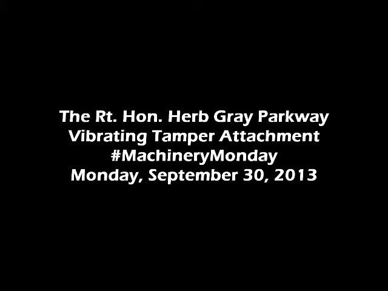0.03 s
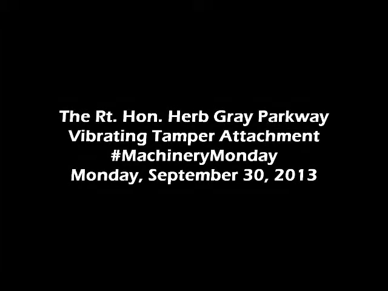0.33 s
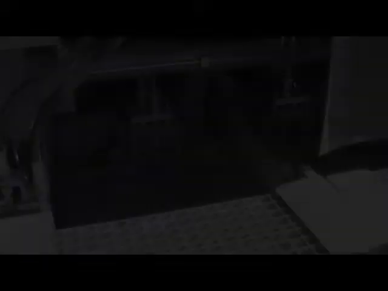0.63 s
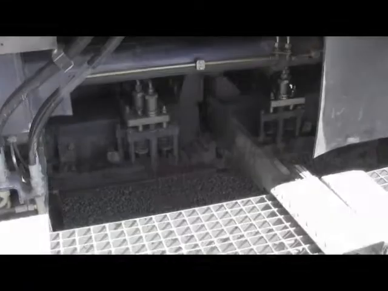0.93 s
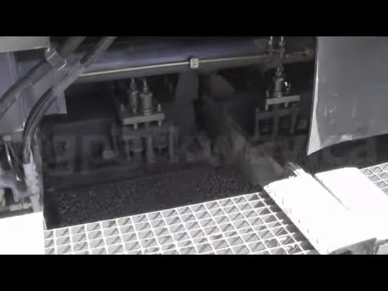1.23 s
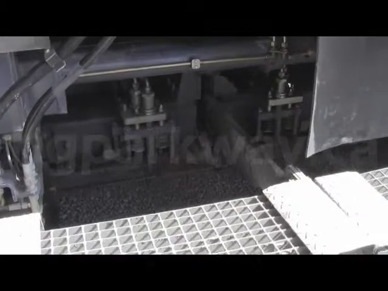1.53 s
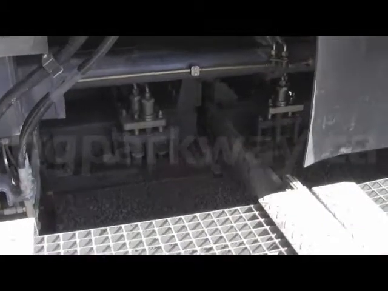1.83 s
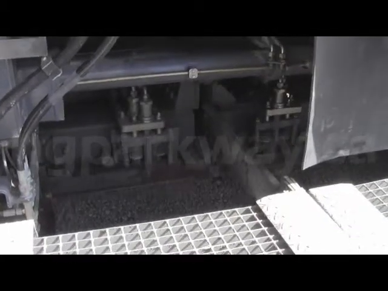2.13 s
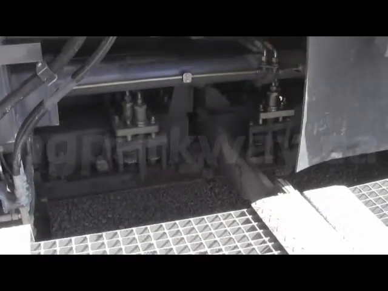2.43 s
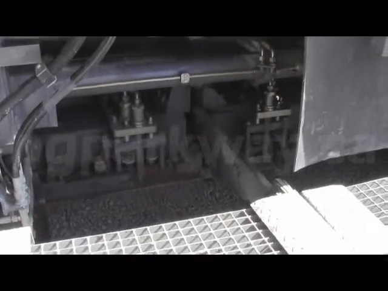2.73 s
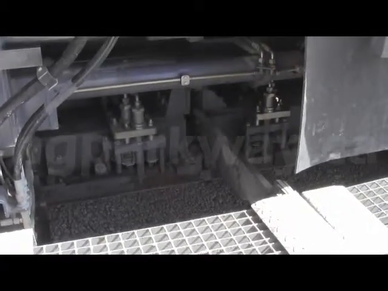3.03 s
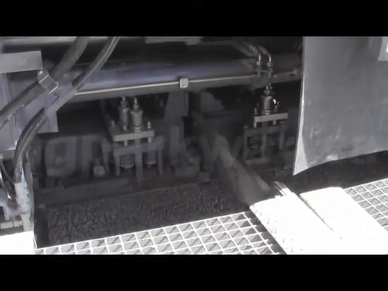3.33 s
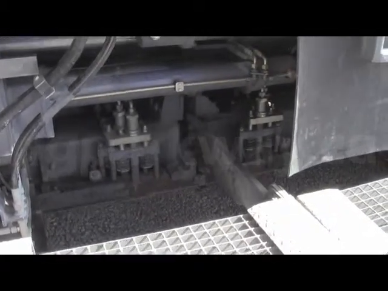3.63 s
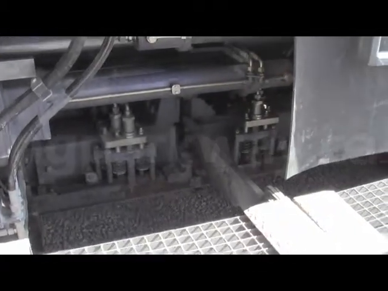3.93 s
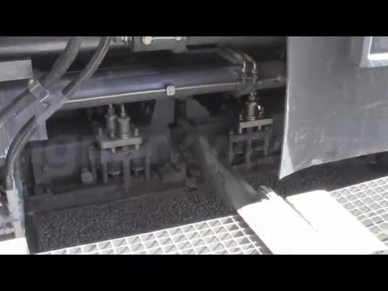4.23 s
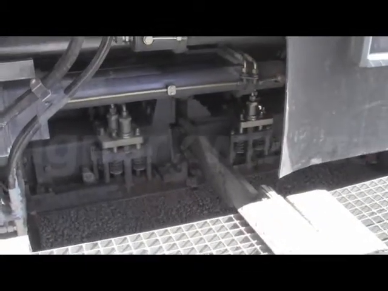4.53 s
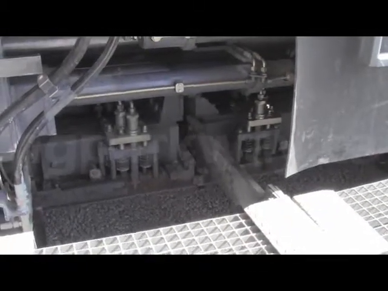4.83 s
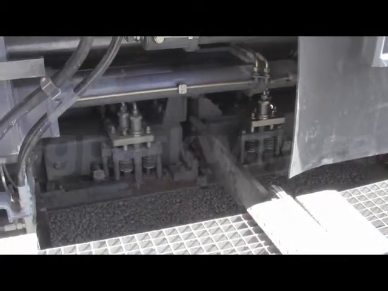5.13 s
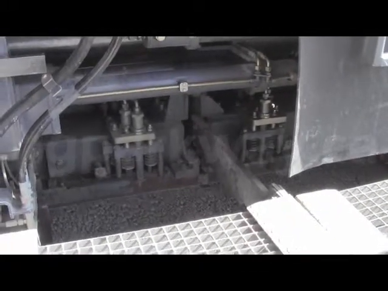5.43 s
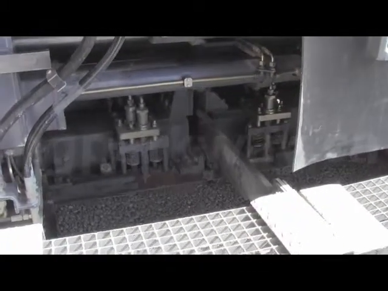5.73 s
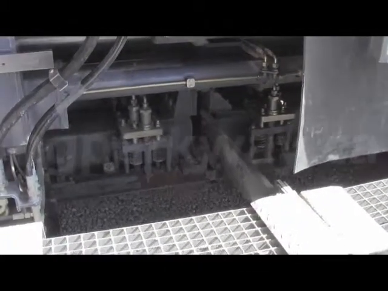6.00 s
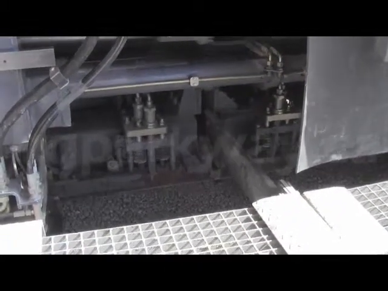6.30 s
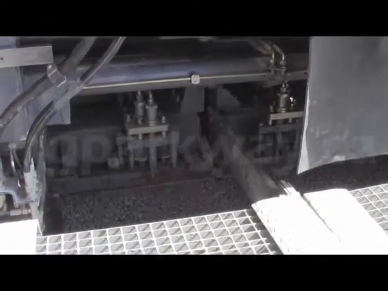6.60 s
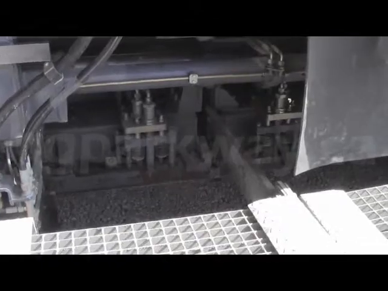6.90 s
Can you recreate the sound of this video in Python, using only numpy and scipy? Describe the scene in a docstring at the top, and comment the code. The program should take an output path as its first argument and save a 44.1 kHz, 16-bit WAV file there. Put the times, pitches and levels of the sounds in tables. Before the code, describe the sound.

After silence, at about 0.7 seconds, the loud sound of an asphalt paver cuts in abruptly, very close, at an outdoor roadworks site. Its diesel engine holds one steady speed, giving a deep booming drone with a buzzing, mid-pitched hum above it. A fan and churning asphalt add a broad, slightly unsteady roar, and a faint, high hydraulic whine sits behind. Throughout, steel parts clatter rapidly in time with the engine, over continuous scraping and the crunch of many small stones on metal. Larger stones clack lightly at around 1.5, 2.9, 4, 5.4, 5.5 and 7 seconds, barely standing out. The rattle swells a little near 1, 1.8, 3.4, 3.8 and 6.1 seconds, while easing very slightly overall. The hum grows a bit stronger around 5 seconds. The machine keeps running evenly until the end, just after 7 seconds.

```python
"""A roadworks site, close by the tamper of an asphalt paver working at steady speed.
Hydraulics whine faintly behind the roar of fan and auger. The diesel drones on the multiples of
its firing rate; steel parts clatter with each firing and stones crunch against the steel.
Two closely spaced microphone ports pick it up, and the sound cuts in abruptly."""
import sys
import numpy as np
from scipy import signal
from scipy.fft import rfft, irfft
from scipy.io import wavfile
from scipy.ndimage import uniform_filter1d

SR = 44100
rng = np.random.default_rng(int(sys.argv[2]) if len(sys.argv) > 2 else 0)


def waveform_to_disk(signal):
    """Save audio, clipped to [-1, 1], as 16-bit WAV at the path in sys.argv[1]."""
    frames = np.transpose(np.atleast_2d(signal))
    scaled = np.clip(frames, -1, 1) * 32767
    samples = np.round(scaled).astype(np.int16)
    wavfile.write(sys.argv[1], SR, samples)


N = 315756
TIME, FREQ = np.arange(N) / SR, np.fft.rfftfreq(N, 1 / SR)


def amp(db):
    """Decibels to gain."""
    return 10 ** (np.asarray(db) / 20)


def unit(x):
    """Scales to rms 1."""
    return x / np.sqrt(np.mean(x ** 2) + 1e-20)


def curve(points):
    """A time table at every sample."""
    return np.interp(TIME, *np.transpose(points))


def across(points):
    """A frequency table at every bin, on a log axis."""
    hz, value = np.transpose(points)
    return np.interp(np.log(FREQ + 1), np.log(hz + 1), value)


def wander(rate_hz):
    """Smooth random drift of rms 1, mostly slower than the rate."""
    return unit(irfft(rfft(rng.standard_normal(N)) / (1 + (FREQ / rate_hz) ** 2), N))


def resonance(pitch_hz, width_hz):
    """A spectral peak of height 1, its width taken at half height."""
    return 1 / (1 + (2 * (FREQ - pitch_hz) / width_hz) ** 2)


def ringing(hits, decay_s):
    """Each hit's power dies away exponentially."""
    return signal.lfilter([1], [1, -np.exp(-1 / (decay_s * SR))], hits)


def spread(pair, colour):
    """Colours two unrelated signals and blends them into left and right at rms 1, alike in the bass."""
    # likeness of left and right: frequency_hz, correlation
    likeness = [(25, .98), (60, 1), (200, 1), (600, 0.92), (1300, 0.98), (2700, 0.97), (5900, 0.95),
                (9000, 0.81), (12500, 0.57)]
    same = np.clip(across(likeness), -1, 1)
    a, b = rfft(pair) * colour
    mid, side = a * np.sqrt((1 + same) / 2), b * np.sqrt((1 - same) / 2)
    return unit(irfft(np.array([mid + side, mid - side]), N))


def hydraulic_whine():
    """Rushing oil excites narrow resonances."""
    # the resonances: pitch_hz, width_hz, rms_db
    whines = [(2057, 30, -34.5), (6280, 110, -48)]
    return sum(amp(db) * spread(rng.standard_normal((2, N)), resonance(hz, width))
               for hz, width, db in whines)


def fan_and_auger(churn_db):
    """Turbulent air and churning asphalt make a slightly unsteady roar."""
    # spectrum of the roar: frequency_hz, relative_db
    colour = [(20, -50), (40, -42), (56, -16), (66, -13), (85, -14.5), (105, -5), (135, -2.5), (230, 1.5),
              (270, -1.5), (310, 2), (380, 0), (450, -0.5), (750, -1.5), (1200, -9), (3000, -19),
              (12000, -37.5)]
    turbulence = rng.standard_normal((2, N)) * amp(churn_db * wander(rate_hz=8.2))
    return spread(turbulence, amp(across(colour)))


def drone(firings, notes, shimmer, jitter_rad, flutter_hz):
    """Multiples of the firing rate, rms 1 in all; uneven combustion shakes the size and timing of each."""
    tone = np.zeros(N)
    for multiple, db in notes:
        phase = 2 * np.pi * (multiple * firings + rng.random()) + jitter_rad * wander(flutter_hz)
        tone += amp(db) * (1 + shimmer * wander(flutter_hz)) * np.cos(phase)
    return unit(tone)


def exhaust(firings):
    """The exhaust booms on two slowly easing low notes; a third above them swells and fades."""
    # the low notes: firing_multiple, relative_db
    low_notes = [(1, -13), (2, 0)]
    # swell of the third note: time_s, level_db
    throb_level = [(.95, -19), (1.55, -24.6), (2.25, -21), (5.0, -24.5), (5.4, -21), (7.1, -21)]
    boom = drone(firings, low_notes, shimmer=.14, jitter_rad=.13, flutter_hz=9.7)
    throb = drone(firings, [(3, 0)], shimmer=.17, jitter_rad=.11, flutter_hz=12)
    return amp(-23 - .1 * TIME) * boom + amp(curve(throb_level)) * throb


def housing_hum(firings):
    """The housing resonates at seven times the firing rate."""
    # swell of the hum: time_s, level_db
    hum_level = [(.7, -23), (1.15, -18), (1.7, -21), (2.25, -18), (3.7, -18.5), (4.4, -19.5), (5.0, -15.9),
                 (5.6, -17.5), (7.1, -16.5)]
    return amp(curve(hum_level)) * drone(firings, [(7, 0)], shimmer=.088, jitter_rad=.06, flutter_hz=6.9)


def engine_buzz(firings):
    """The diesel's weaker notes buzz around the housing's hum."""
    # the notes: firing_multiple, relative_db
    notes = [(4, -10.5), (5, -12), (6, -3.6), (8, -4), (9, -2.2), (10, -2.8), (11, 0), (12, -16),
             (13, -8.3), (14, -16), (15, -12), (16, -9.8), (17, -14), (18, -14), (20, -13), (21, -18)]
    return drone(firings, notes, shimmer=.12, jitter_rad=.12, flutter_hz=5)


def knocks(firings, decay_s, uneven_db):
    """Power of the diesel knock: a blow at each firing, and a weaker slap about half a period later."""
    fired, slapped = (np.diff(np.floor(firings + lead), prepend=0) > 0 for lead in (0, .55))
    strength = amp(uneven_db * rng.standard_normal(N))
    power = ringing((fired + slapped / 4) * strength ** 2, decay_s)
    return power / power.mean()


def small_stones(per_s, decay_s, sizes_db):
    """Power of the crunch: many small stones strike the steel."""
    struck = rng.random(N) < per_s / SR
    strength = amp(sizes_db * np.minimum(rng.exponential(1, N), 3))
    power = ringing(struck * strength ** 2, decay_s)
    return power / power.mean()


def large_stones(decay_s):
    """Power of the few larger stones that clack on the steel."""
    # the strikes: start_s, strength_db
    clacks = [(1.4995, 3), (2.9427, 7), (4.0352, 7.5), (5.3667, 6), (5.5353, 6.5), (6.9835, 6.5)]
    hits = np.zeros(N)
    for start_s, db in clacks:
        hits[round(start_s * SR)] = amp(db) ** 2
    return ringing(hits, decay_s)


def tamper_surges():
    """The tamper briefly rattles harder, each time in one smooth arch, in dB."""
    # the surges: middle_s, length_s, swell_db
    surges = [(1.023, 0.1, 1), (1.79, 0.27, 0.9), (3.36, 0.32, 1.5), (3.84, 0.25, 1.5), (6.137, 0.31, 1.8)]
    return sum(db * np.cos(np.pi * np.clip((TIME - middle_s) / length_s, -.5, .5)) ** 2
               for middle_s, length_s, db in surges)


def steel_clatter(firings):
    """Knocks and stones over a steady scraping, all ringing in the same steelwork."""
    # broad colour of the steelwork: frequency_hz, relative_db
    steel = [(200, -20), (700, -1), (1150, -0.5), (1400, 1), (1650, -1.5), (2450, -1), (3100, -3.5),
             (4200, -6.5), (4800, -12), (6300, -14), (6900, -16.5), (9800, -22), (11900, -33.5),
             (13000, -39)]
    # panels that ring above that colour: pitch_hz, width_hz, lift_db
    panels = [(1287, 45, 4.5), (1475, 63, 4.5), (1776, 50, 3.5), (2306, 80, 3.5), (2534, 50, 3),
              (2850, 62, 2), (3240, 85, 0.5), (3370, 63, 0.5), (3730, 58, 1.5), (6600, 61, 1),
              (7370, 200, 2.5)]
    power = 1 + .75 * knocks(firings, decay_s=.003, uneven_db=1.6)  # the 1 is the scraping
    power += small_stones(per_s=520, decay_s=.003, sizes_db=3.2)
    power += large_stones(decay_s=.0032)
    power = uniform_filter1d(power, size=44)  # nearby reflections blunt each attack
    blows = np.sqrt(power) * rng.standard_normal((2, N))
    lift_db = sum(db * resonance(hz, width) for hz, width, db in panels)
    return spread(blows, amp(across(steel) + lift_db))


def scene():
    """The engine's speed paces drone and clatter; the load swells buzz, roar and rattle."""
    # engine speed: time_s, firing_rate_hz
    speed = [(.7, 70.5), (1.3, 70.68), (2.5, 70.59), (4, 70.59), (4.4, 70.47), (5, 70.6), (5.8, 70.51),
             (7.15, 70.55)]
    # load on the machine: time_s, swell_db
    load = [(.7, 1.5), (1.5, .2), (2.35, 0.2), (2.7, -0.6), (3.0, -0.2), (3.9, .4), (4.3, -1.26),
            (4.8, -0.3), (5.4, -0.2), (7.1, 0.15)]
    firings, load_db = np.cumsum(curve(speed)) / SR, curve(load)
    diesel = exhaust(firings) + housing_hum(firings) + amp(-21 + load_db) * engine_buzz(firings)
    roar = amp(-19 + .98 * load_db) * fan_and_auger(churn_db=.34)
    rattle_db = -20 + .49 * load_db - .1651 * TIME  # the rattle slowly eases
    rattle_db += tamper_surges() + .25 * wander(rate_hz=5)
    rattle = amp(rattle_db) * steel_clatter(firings)
    return hydraulic_whine() + roar + diesel + rattle


def record(dry):
    """Two closely spaced microphone ports, softly rounded peaks, the abrupt start and the band limit."""
    # balance between the ports: frequency_hz, left_minus_right_db
    balance = [(70, 0), (140, -.5), (210, -1), (360, 0), (650, 1), (1170, 2.2), (2130, 2.4), (3850, .5),
               (7000, 0), (12600, -.7)]
    # phase between the ports: frequency_hz, left_lead_rad
    lead = [(70, 0), (200, .06), (600, .21), (1500, .17), (3500, .05), (8400, .2), (10200, .25),
            (11400, .7), (12300, 2.6)]
    ceiling, start_s, fade_s, cutoff_hz = .92, .6745, .0015, 12600
    tilt = amp(across(balance) / 2) * np.exp(.5j * across(lead))
    ports = irfft(rfft(dry) * np.array([tilt, 1 / tilt]), N)
    ports /= (1 + abs(ports / ceiling) ** 8) ** (1 / 8)
    ports *= np.clip((TIME - start_s) / fade_s, 0, 1)
    lowpass = signal.firwin(255, cutoff_hz, window=("kaiser", 9), fs=SR)
    return signal.oaconvolve(ports, lowpass[None], "same")


dry = scene()
out = record(dry)
waveform_to_disk(out)
```